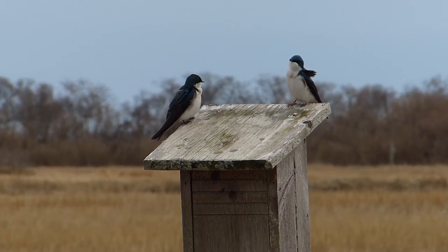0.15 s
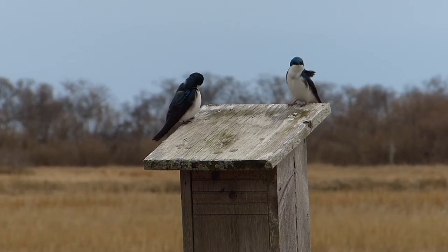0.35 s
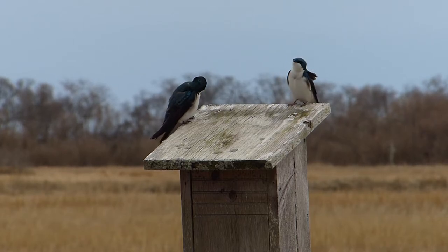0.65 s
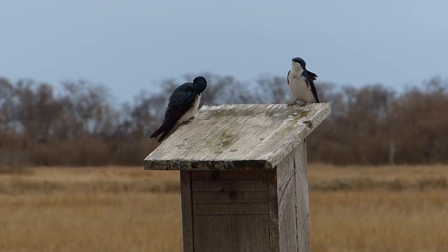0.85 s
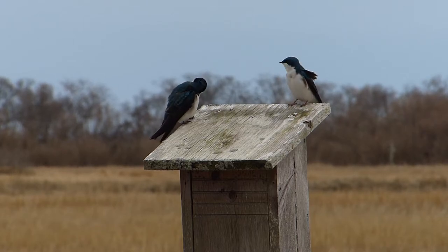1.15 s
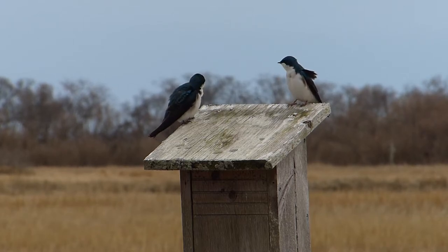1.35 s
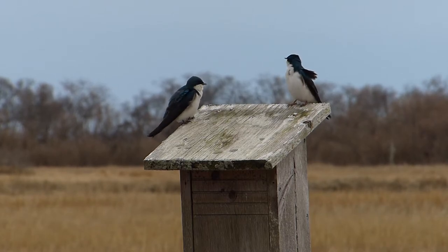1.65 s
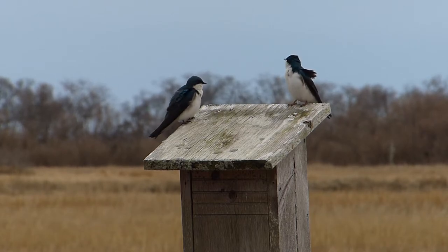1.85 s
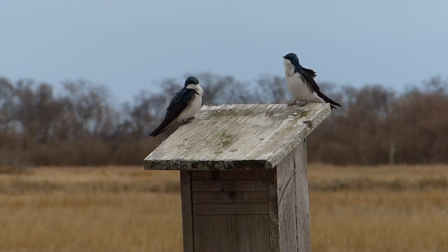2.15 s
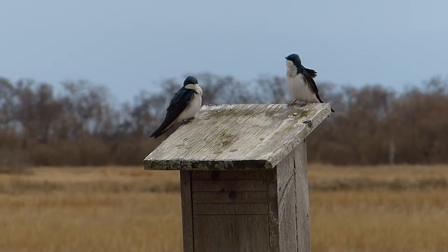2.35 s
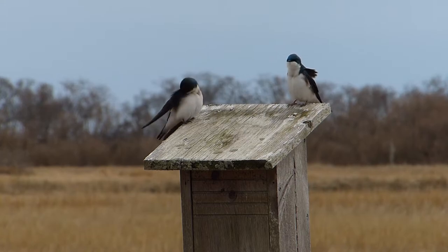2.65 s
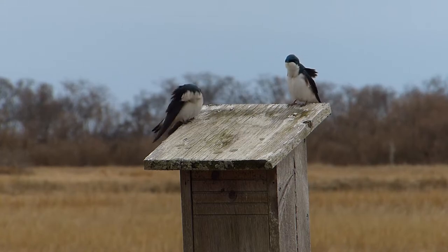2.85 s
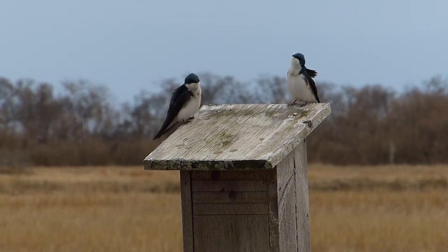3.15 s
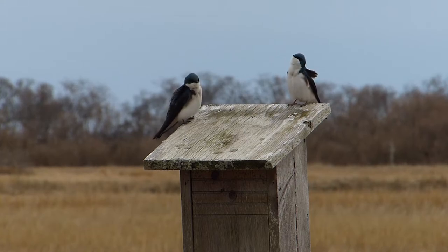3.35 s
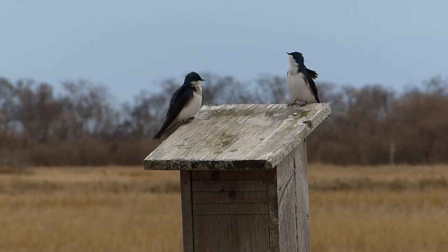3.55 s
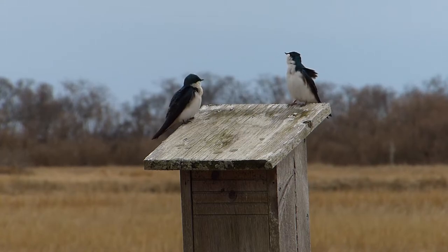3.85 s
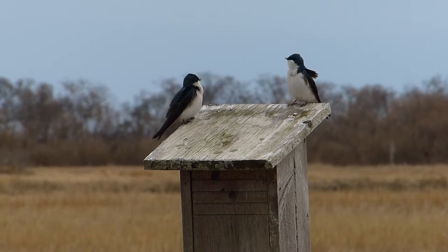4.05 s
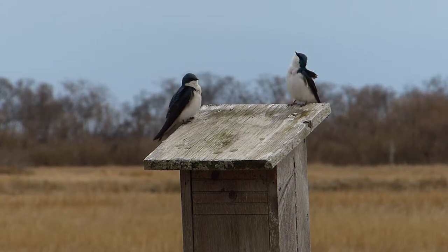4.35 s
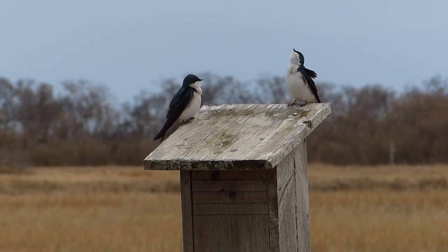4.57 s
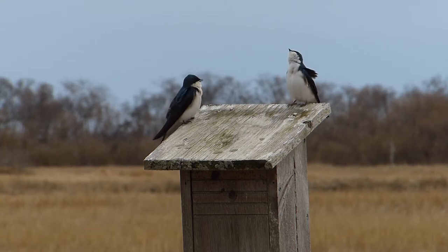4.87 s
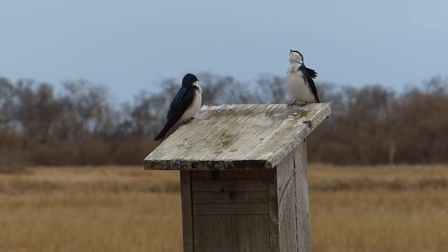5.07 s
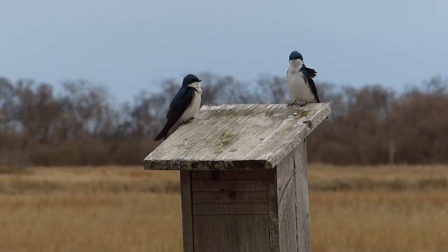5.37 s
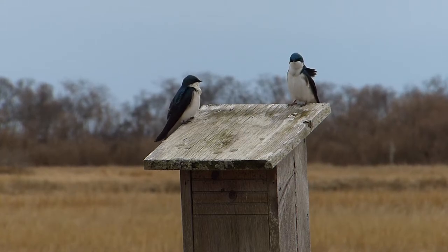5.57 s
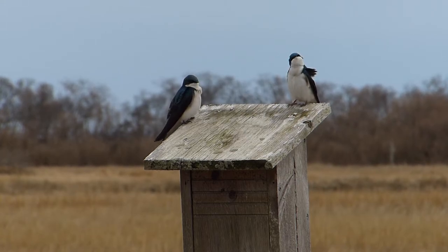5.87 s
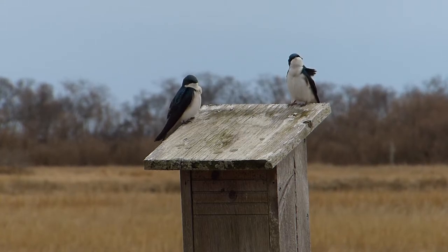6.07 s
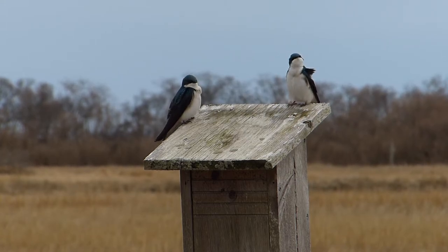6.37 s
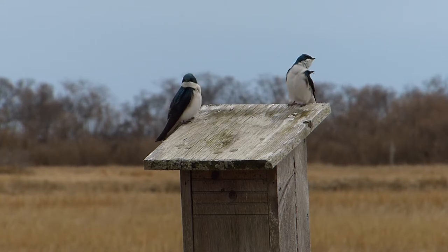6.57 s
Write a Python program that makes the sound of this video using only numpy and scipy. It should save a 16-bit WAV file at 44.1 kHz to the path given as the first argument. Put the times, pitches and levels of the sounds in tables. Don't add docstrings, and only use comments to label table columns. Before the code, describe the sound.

Bright, bubbling bird chirps come in short rapid clusters outdoors, with fainter chips from farther birds and a soft constant low rumble beneath.

```python
import sys
import numpy as np
from scipy import signal
from scipy.fft import rfft, irfft
from scipy.io import wavfile

SR = 44100
rng = np.random.default_rng(int(sys.argv[2]) if len(sys.argv) > 2 else 0)


def pcm_store(signal):
    levels = np.round(np.clip(np.atleast_2d(signal), -1, 1) * 32767)
    wavfile.write(sys.argv[1], SR, levels.astype(np.int16).T)


def boost(x):
    u = np.asarray(x, float) / 20
    return 10 ** u


N = 296352

# [f/Hz, level/dB per Hz]
HUM_SPECTRUM = [(12, -38), (20, -6.5), (38, -5.5), (81, -2), (130, -3), (337, -13.5), (410, -16),
                (2670, -27), (3740, -27.5), (16000, -31.5)]
# [f/Hz, level/dB per Hz]
UNLIKE_SPECTRUM = [(12, -11), (20, 2.5), (232, -3), (725, -7.5), (3960, -10.5), (15500, -11.5)]
HUM_DB, UNLIKE_DB, LEFT_HUM_DB = -51, -58.5, -0.16
WHINE_HZ, WHINE_DB = 15734.3, -76.5

# [t/s, level/dB, centre f/Hz]
FAR_CHIPS = [(.497, -63, 3640), (0.586, -55, 3700), (0.682, -54.5, 3490), (0.783, -58, 3520),
             (0.881, -56, 3560), (.988, -59, 3390), (1.103, -54, 3500), (1.279, -54, 3390),
             (3.924, -60.5, 3570), (4.796, -64, 2620), (5.547, -58, 2510), (5.824, -57.5, 2575),
             (6.115, -55, 2470)]
# [end pitch as share of centre, level/dB]
CHIP_FALLS = [
    (0.84, 5),
    (0.27, 2.5),
    (0.48, 2.5),
]
# [t/s, level/dB]
FAR_GURGLES = [
    (2.819, -53.5),
    (2.979, -49),
    (3.389, -50.5),
]
# [t/s from its start, length/ms, start f/Hz, middle f/Hz, end f/Hz, level/dB]
GURGLE_SLURS = [
    (-.009, 12.7, 1910, 2890, 3750, -1),
    (0., 12.8, 1680, 3450, 2300, 3),
    (0.01, 10.8, 4600, 3610, 3100, 1.5),
    (.018, 12, 4620, 3680, 2730, -1.5),
    (.028, 12, 4400, 3700, 3000, -4),
    (.038, 11, 4110, 3550, 2900, -9),
]
# [t/s, level/dB, centre f/Hz]
BEAK_TICKS = [
    (2.918, -50.5, 1980),
    (3.069, -42, 3300),
    (5.586, -51, 3720),
]

# [t/s, centre f/Hz, level/dB]
LEAD_INS = [(1.222, 4850, -50), (1.860, 5150, -47), (1.9263, 5400, -42.5), (2.0853, 5470, -37.5),
            (2.1465, 5400, -41.5), (2.447, 6100, -43), (2.5112, 5430, -41), (3.3883, 5330, -44),
            (3.446, 6130, -50), (3.51, 5180, -42.5), (4.131, 5470, -42.5), (4.2034, 5130, -42)]
# [t/s, length/ms, f/Hz, level/dB]
BRIGHT_PIPS = [(1.8726, 5.9, 5000, -42), (1.937, 7.6, 4980, -42), (2.096, 7.1, 5050, -37),
               (2.1539, 8.5, 5160, -38), (2.2255, 7, 5200, -38), (2.4563, 8.7, 5120, -31.5),
               (2.5213, 5.5, 5080, -32), (2.6254, 6.5, 5020, -38), (3.3984, 6, 4930, -43),
               (3.4575, 5.5, 5200, -41), (3.5206, 4.1, 5010, -39.5), (4.0728, 6, 5350, -37),
               (4.1416, 8.1, 4900, -38.5)]
# [t/s, length/ms, centre f/Hz, level/dB]
STRAIGHT_FALLS = [(1.2325, 4.1, 4050, -46.5), (1.8809, 5.4, 5020, -44), (1.8883, 8.2, 3500, -47),
                  (1.9454, 5.6, 5050, -39.5), (1.9542, 8.5, 3600, -46.5), (2.1035, 4, 4050, -45),
                  (2.1095, 9, 5000, -43), (2.1647, 7, 5030, -38.5), (2.2338, 4, 4760, -33.5),
                  (2.4675, 8, 3870, -42), (2.4705, 4.7, 5030, -35), (2.476, 9.8, 3660, -43.5),
                  (2.5277, 9.5, 5060, -35), (2.6345, 8.3, 4460, -41.5), (2.645, 9, 4620, -40),
                  (2.6572, 3.8, 3740, -42), (2.661, 9.8, 2770, -52), (3.409, 5, 4400, -47),
                  (3.4643, 9.8, 4570, -44), (3.471, 12, 3770, -49), (3.5266, 6.6, 4920, -42),
                  (3.531, 4.4, 3780, -44.5), (4.0796, 9.5, 4540, -43.5), (4.093, 8, 4700, -48),
                  (4.142, 5.2, 2780, -48)]
# [t/s, length/ms, start f/Hz, top f/Hz, level/dB]
RISING_LINKS = [
    (1.9073, 18, 3050, 4130, -49.5),
    (2.4892, 22, 3430, 4300, -45.5),
    (3.43, 13, 3130, 4270, -40.5),
    (3.4937, 13, 3360, 4180, -45.5),
    (4.112, 12.5, 2930, 4300, -42.5),
]
LEAD_MS, LEAD_HZ_PER_MS, FALL_HZ_PER_MS = 7.56, 149, 250.0
PIP_RISE, PIP_DROOP = 0.033, 0.13
LINK_RISE_SHARE, LINK_TIP_HZ = 0.7, 700.0

# [t/s the hold starts, hold/ms, f/Hz, level/dB, climb level/dB against the hold]
ARCH_NOTES = [(1.6313, 11, 3590, -42.5, -3), (1.722, 11, 3260, -43, -11), (2.1218, 12, 3690, -38, -4),
              (2.2014, 9, 3920, -33.5, -14), (3.742, 11, 3450, -41.5, -1.5), (3.8226, 6.8, 3440, -43, -5),
              (4.19, 9.7, 3820, -44, -21), (4.203, 11, 3600, -39, -5), (4.507, 6.3, 3830, -38.5, -25),
              (4.57, 7, 3620, -37, -5), (4.9525, 14.6, 3780, -36.5, -15), (5.3603, 6.7, 4070, -36.5, -20),
              (5.4168, 10, 3900, -33.5, -14)]
# [t/s, hold/ms, f/Hz, level/dB]
SHELF_NOTES = [(1.5146, 12, 4050, -46), (1.5463, 6.4, 4180, -40), (1.559, 12, 3530, -47),
               (1.568, 8, 3280, -41.5), (1.5915, 12, 3930, -40.5), (1.659, 13, 4020, -39.5),
               (1.7504, 9.4, 3840, -47), (2.0638, 3.6, 3600, -41), (2.09, 7.2, 4000, -35),
               (2.15, 11, 4270, -34.5), (2.226, 14, 4130, -34), (3.6843, 7.8, 3060, -45.5),
               (3.71, 5, 3730, -39), (3.769, 13.4, 4020, -39), (3.8452, 14.7, 3940, -40),
               (4.058, 6, 4100, -54), (4.164, 7.5, 3850, -38), (4.2302, 10.3, 4100, -35.5),
               (4.534, 7.4, 3630, -33.5), (4.59, 12.5, 3950, -32.5), (4.8855, 6.8, 3700, -37.5),
               (4.913, 5.6, 3700, -35), (4.9839, 13, 3750, -39), (5.3878, 4.4, 3680, -38),
               (5.4408, 12.8, 4080, -31.5)]
# [t/s, length/ms, top bead f/Hz, middle bead level/dB, top bead level/dB]
DIVE_NOTES = [(1.5806, 11, 4350, -45, -39), (1.646, 14, 4860, -44, -50), (1.738, 11, 4600, -46, -43),
              (2.073, 16, 4900, -39, -50), (2.137, 14, 4900, -38, -41), (2.214, 13, 5000, -38, -35),
              (3.698, 12, 4380, -45, -43), (3.7269, 7.8, 4300, -46, -42), (3.757, 13, 4830, -46, -44),
              (3.833, 12, 4920, -42, -44), (4.152, 12.3, 5030, -37, -44), (4.2147, 16.5, 4930, -39, -40),
              (4.52, 15, 4900, -33.5, -36), (4.581, 10.3, 4880, -36, -34), (4.897, 15.4, 4920, -33, -39.5),
              (4.968, 17.5, 4850, -32, -40.5), (5.371, 16.5, 4900, -33, -43),
              (5.4293, 13.5, 4950, -36, -41)]
# [t/s, length/ms, end f/Hz, middle bead level/dB, low bead level/dB]
SLIDE_NOTES = [(1.605, 16, 2350, -41, -48), (1.673, 17, 2420, -40, -46), (2.162, 14.7, 2500, -36, -41),
               (2.241, 13.7, 2340, -36.5, -43), (3.783, 16.6, 2350, -38.5, -45),
               (3.86, 16, 2700, -42.5, -49), (4.179, 13, 2700, -40, -49), (4.242, 16, 2380, -38, -43.5),
               (4.603, 19, 2830, -33.5, -39), (5.454, 17, 2970, -33.5, -40)]
# [t/s, length/ms, start f/Hz, end f/Hz, level/dB]
TAIL_NOTES = [(1.492, 11, 3600, 3400, -53), (1.505, 6, 3070, 2370, -51), (1.530, 15, 3672, 2037, -49),
              (2.103, 9.4, 3660, 2400, -42), (2.173, 10, 4540, 2310, -44), (2.434, 10, 4200, 4300, -56),
              (2.480, 8, 3500, 2810, -53), (2.540, 14, 4800, 3300, -41.5), (2.553, 18, 3470, 3600, -48.5),
              (2.615, 8, 2250, 2650, -52), (3.479, 15, 3300, 2850, -53), (3.537, 9, 3300, 3400, -51),
              (3.713, 9.5, 3300, 2400, -43), (4.104, 7, 2900, 2470, -48), (4.146, 8, 4500, 3100, -48),
              (4.5405, 17, 3150, 2240, -44), (4.552, 9.9, 2240, 2030, -52), (4.917, 14, 3440, 2500, -38.5),
              (4.9305, 7.5, 2460, 2060, -50.5), (4.9385, 9.5, 2310, 3310, -51),
              (5.391, 13.2, 3360, 2510, -39), (5.400, 10, 2570, 1970, -51)]
CLIMB_MS, CLIMB_FROM_HZ = 9.8, 2130
ARCH_BOW = 0.05
SAG_HZ, SAG_HZ_PER_MS = 190.0, 11
DROP_MS, DROP_OVERLAP_MS, DROP_HZ, DROP_DB = 4.78, 1.46, 3050, -5.5
# (start and length as shares of the note, start f/Hz, middle f/Hz, end f/Hz)
DIVE_MIDDLE, DIVE_LOW = (0.42, 0.44, 4600, 4020, 2980), (0.76, 0.36, 3860, 2800, 3900)
SLIDE_TOP, SLIDE_MIDDLE = (0.0084, 0.29, 5400, 4900, 4200), (0.17, 0.4, 5100, 3950, 3330)
DIVE_LOW_DB, SLIDE_TOP_DB = -11, -19
DIVE_TOP_SHARE, DIVE_TOP_SAG = 0.41, 0.033
SLIDE_LOW_FROM, SLIDE_LOW_HZ, TAIL_BOW = 0.56, 3550, 0.66

OVERTONE_DB, SWELL = -18.5, 0.51
NEAR_RASP_DB, FAR_RASP_DB = -25, -12
ROOF_NOTCH_STEP_HZ, ROOF_DB = 1130, -16.5
NEAR_SCATTER_DB, FAR_SCATTER_DB = -20, -8
SCATTER_T60_S = 0.3
CUTOFF_HZ = 15810


def coloured(spectrum):
    hz = np.maximum(np.fft.rfftfreq(N, 1 / SR), 1)
    hz_at, db_at = np.transpose(spectrum)
    gain = boost(np.interp(np.log(hz), np.log(hz_at), db_at))
    noise = irfft(rfft(rng.standard_normal(N)) * gain, N)
    return noise / np.std(noise)


def marsh():
    common = boost(HUM_DB) * coloured(HUM_SPECTRUM)
    unlike = boost(UNLIKE_DB) * coloured(UNLIKE_SPECTRUM)
    sides = np.array([[1], [-1]])
    whine = boost(WHINE_DB) * np.sqrt(2) * np.sin(2 * np.pi * WHINE_HZ * np.arange(N) / SR)
    return (common + unlike * sides) * boost(LEFT_HUM_DB / 2 * sides) + whine


def whistles(notes, rasp_db):
    out = np.zeros(N)
    rasp = signal.lfilter(*signal.butter(2, 900, fs=SR), rng.standard_normal(N))
    rasp = 1 + boost(rasp_db) * rasp / np.std(rasp)
    for s, ms, start_hz, mid_hz, end_hz, db in notes:
        u = np.linspace(-1, 1, round(ms * SR / 1000))
        bend_hz = (start_hz + end_hz) / 2 - mid_hz
        hz = mid_hz + (end_hz - start_hz) / 2 * u + bend_hz * u ** 2
        phase = 2 * np.pi * (np.cumsum(hz) / SR + rng.random())
        swell = np.clip(np.cos(np.pi * u / 2), 0, 1) ** (SWELL * min(1, 13.7 / ms))
        octave = boost(OVERTONE_DB - 10.5 * (hz - 3500) / 1000 + 0.54 * (db + 33.5)) * (1 + u)
        at = round(s * SR)
        out[at:at + len(u)] += boost(db) * swell * (np.sin(phase) + octave * np.sin(2 * phase))
    return out * rasp


def far_birds():
    notes = []
    for s, db, hz in FAR_CHIPS:
        for k, (low, rel_db) in enumerate(CHIP_FALLS):
            notes.append((s + k * 0.0061 * hz / 3600, 7.0, hz * 1.092, hz, hz * low, db + rel_db))
    for s, db in FAR_GURGLES:
        for ds, ms, a, b, c, rel_db in GURGLE_SLURS:
            level = db + rel_db
            notes.append((s + ds, ms, a, b, c, level))
            notes.append((s + ds + 0.002, ms, 0.736 * a, 0.76 * b, 0.62 * c, level - 10.0))
    for s, db, hz in BEAK_TICKS:
        notes.append((s, 2.2, hz * 0.88, hz, hz * 0.19, db))
    return whistles(notes, FAR_RASP_DB)


def fall(s, ms, top_hz, low_hz, bow, db):
    return s, ms, top_hz, top_hz - bow * (top_hz - low_hz), low_hz, db


def high_bird():
    notes = []
    for s, hz, db in LEAD_INS:
        half = LEAD_HZ_PER_MS * LEAD_MS / 2
        notes.append(fall(s, LEAD_MS, hz + half, hz - half, 0.56, db))
    for s, ms, hz, db in BRIGHT_PIPS:
        notes.append((s, ms, hz * (1 - PIP_RISE), hz, hz * (1 - PIP_DROOP), db))
    for s, ms, hz, db in STRAIGHT_FALLS:
        half = FALL_HZ_PER_MS * ms / 2
        notes.append(fall(s, ms, hz + half, hz - half, 0.503, db))
    for s, ms, hz, top_hz, db in RISING_LINKS:
        notes.append(fall(s, LINK_RISE_SHARE * ms, hz, top_hz, 0.63, db))
        tip_s = s + 0.57 * ms / 1000
        notes.append(fall(tip_s, 0.47 * ms, top_hz, top_hz - LINK_TIP_HZ, 0.41, db - 0.5))
    return notes


def bead(s, ms, shape, db):
    start_share, length_share, *path_hz = shape
    return s + start_share * ms / 1000, length_share * ms, *path_hz, db


def low_bird():
    notes = []
    for s, ms, top_hz, end_hz, db in TAIL_NOTES:
        notes.append(fall(s, ms, top_hz, end_hz, TAIL_BOW, db))
    for s, ms, hz, db in SHELF_NOTES:
        half = SAG_HZ + SAG_HZ_PER_MS * ms / 2
        notes.append(fall(s, ms, hz + half, hz - half, 0.496, db))
    for s, ms, hz, db, climb_db in ARCH_NOTES:
        edge_hz = hz * (1 - ARCH_BOW)
        notes.append((s, ms, edge_hz, hz, edge_hz, db))
        climb_s = s - (CLIMB_MS - DROP_OVERLAP_MS) / 1000
        notes.append(fall(climb_s, CLIMB_MS, CLIMB_FROM_HZ, hz, 0.486, db + climb_db))
    for s, ms, hz, db, *_ in ARCH_NOTES + SHELF_NOTES:
        drop_s = s + (ms - DROP_OVERLAP_MS) / 1000
        mid_hz = min(DROP_HZ, 0.85 * hz)
        end_hz = min(DROP_HZ, 0.74 * hz) - 120.0
        notes.append((drop_s, DROP_MS, 0.92 * hz, mid_hz, end_hz, db + DROP_DB))
    for s, ms, hz, db, top_db in DIVE_NOTES:
        sag_hz = hz * DIVE_TOP_SAG
        notes.append(fall(s, DIVE_TOP_SHARE * ms, hz + sag_hz, hz - sag_hz, 0.68, top_db))
        notes.append(bead(s, ms, DIVE_MIDDLE, db))
        notes.append(bead(s, ms, DIVE_LOW, db + DIVE_LOW_DB))
    for s, ms, hz, db, low_db in SLIDE_NOTES:
        notes.append(bead(s, ms, SLIDE_TOP, db + SLIDE_TOP_DB))
        notes.append(bead(s, ms, SLIDE_MIDDLE, db))
        low_s = s + SLIDE_LOW_FROM * ms / 1000
        notes.append(fall(low_s, (1 - SLIDE_LOW_FROM) * ms, SLIDE_LOW_HZ, hz, TAIL_BOW, low_db))
    return notes


def roof_echo(x):
    lag = round(SR / ROOF_NOTCH_STEP_HZ)
    return x - boost(ROOF_DB) * np.concatenate([np.zeros(lag), x[:-lag]])


def scatter(x):
    t = np.arange(round(0.25 * SR)) / SR
    fade = boost(-60 * t / SCATTER_T60_S) * np.clip(t / 0.0037, 0, 1)
    tail = rng.standard_normal((2, len(t))) * fade
    tail = tail + 1.8 * tail.sum(axis=0)
    tail = tail / np.sqrt(np.sum(tail ** 2, axis=1, keepdims=True))
    return signal.fftconvolve(x[None], tail, axes=1)[:, :N]


def scene():
    background = marsh()
    far = far_birds()
    near = roof_echo(whistles(high_bird() + low_bird(), NEAR_RASP_DB))
    smear = scatter(boost(NEAR_SCATTER_DB) * near + boost(FAR_SCATTER_DB) * far)
    return near + far + smear + background


def band_limit(x):
    return signal.sosfilt(signal.butter(12, 17080, fs=SR, output="sos"), x)


def record(dry):
    spectrum = rfft(dry, axis=1) * (np.fft.rfftfreq(N, 1 / SR) < CUTOFF_HZ)
    mix = irfft(spectrum, N, axis=1)
    return band_limit(mix)


dry = scene()
out = record(dry)
pcm_store(out)
```